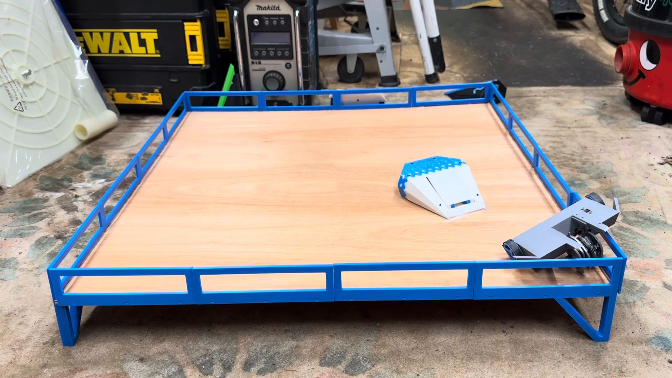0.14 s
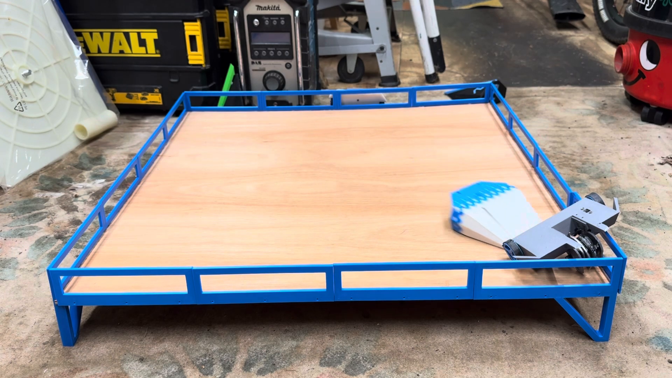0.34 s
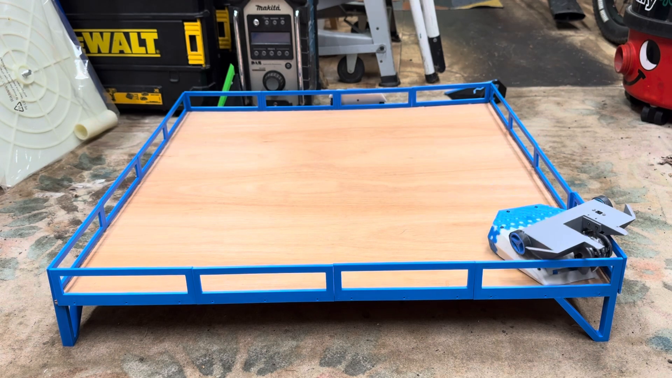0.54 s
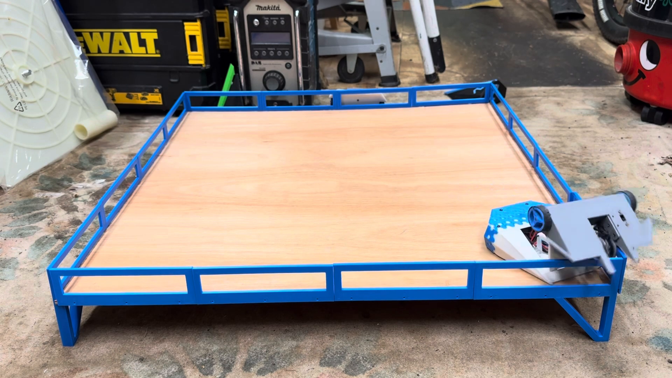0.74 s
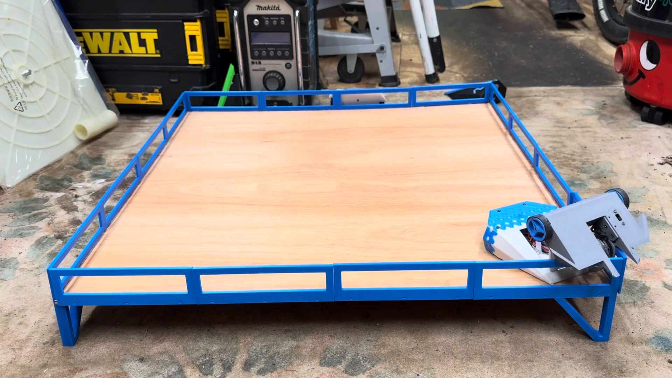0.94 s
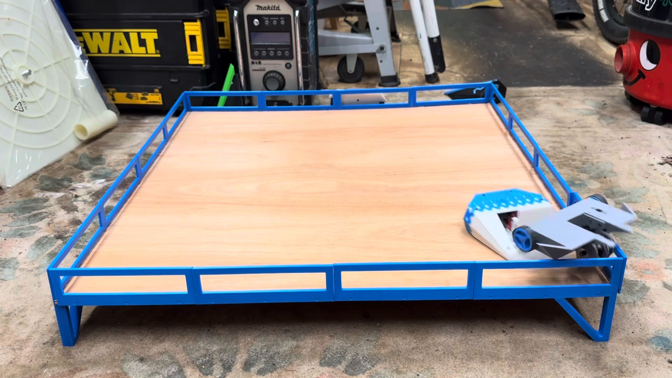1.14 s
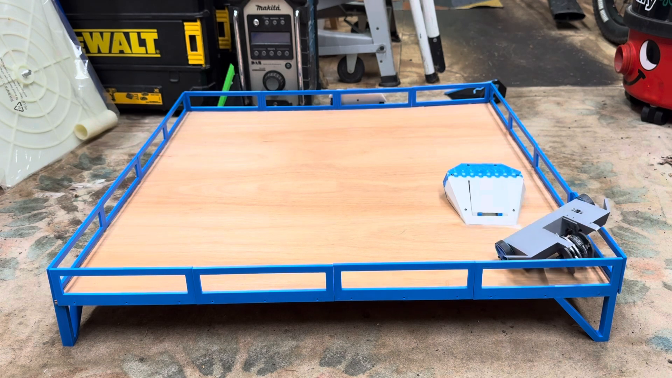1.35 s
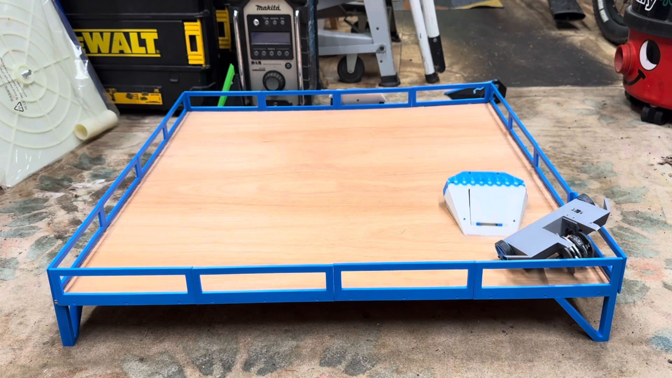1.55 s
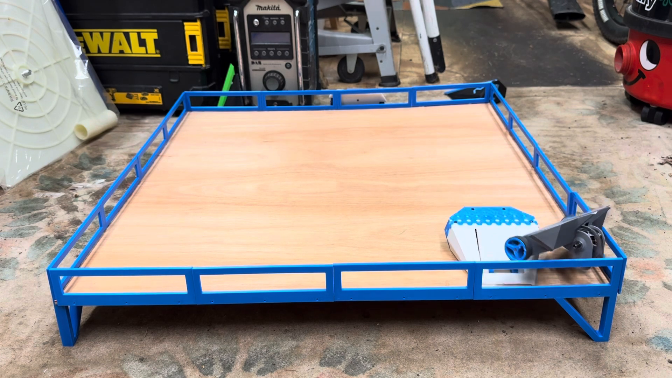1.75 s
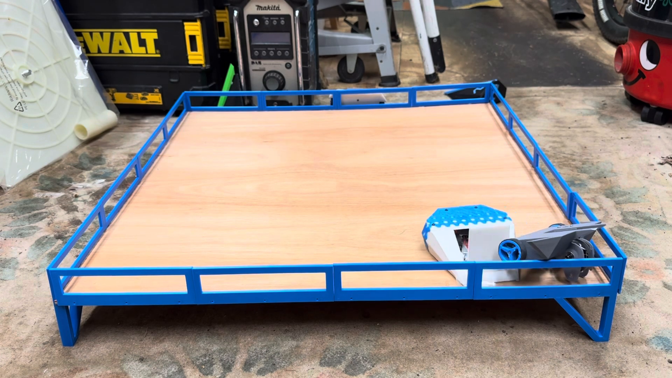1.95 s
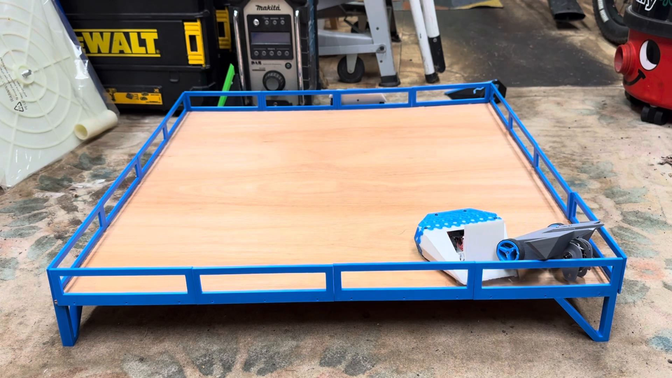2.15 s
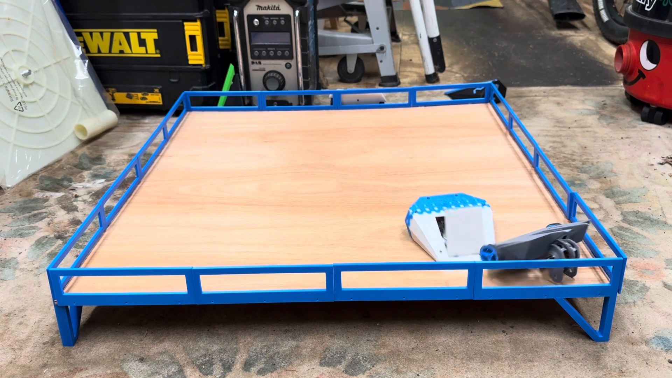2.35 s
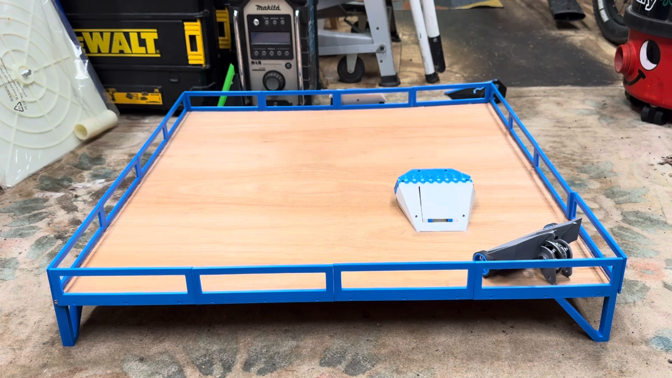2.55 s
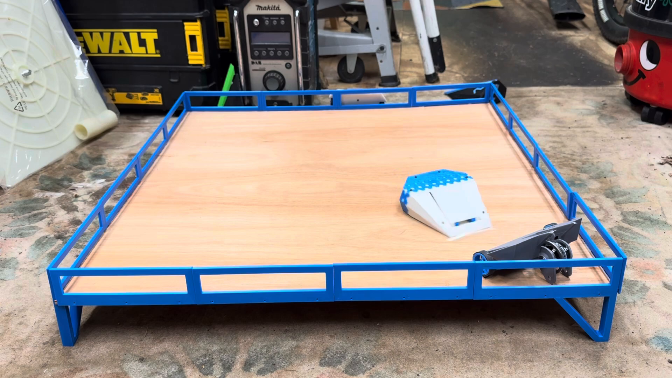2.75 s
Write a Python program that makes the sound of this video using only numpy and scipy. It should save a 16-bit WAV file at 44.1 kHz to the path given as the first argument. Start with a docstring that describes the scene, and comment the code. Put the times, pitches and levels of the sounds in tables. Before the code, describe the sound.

Two small remote-controlled robots whir and grind on a wooden board, close in stereo in a garage. A brief coasting whir fades, then from 0.15 to 0.9 seconds gears buzz, wheels judder, shells clack and rasp. A short burst at 1.0 ends in clustered knocks near 1.25. Another shove runs 1.45 to 2.1, then a short whir, the loudest sharp knock at 2.4, and fading gears with a faint last spin.

```python
"""Two small remote-controlled robots shove each other in short bursts on a wooden arena floor in a garage.
Gears click and hiss at motor speed, loose ones buzz on a pitch, and overtones of one tone make the motors whine.
Random clicks with their own tone colours become juddering plastic wheels, rasping shells and arena rumble.
Shells knock, once sharply, as a click, then a thump and chatter; wood and shells ring along with the contacts.
A close pair of microphones hears this with quick reflections and the tail of the room."""
import sys
import numpy as np
from scipy import signal
from scipy.fft import rfft, irfft
from scipy.io import wavfile

SR = 44100
rng = np.random.default_rng(int(sys.argv[2]) if len(sys.argv) > 2 else 0)


def generate_wav(sig):
    """Save sig (samples, or channels by samples) to the path in sys.argv[1] as 16-bit PCM at SR."""
    pcm = np.round(np.clip(np.atleast_2d(sig).T, -1, 1) * 32767).astype(np.int16)
    wavfile.write(sys.argv[1], SR, pcm)


N = 121275  # samples, 2.75 s

# Bursts of throttle: [start t/s, spin-up t/s, hold t/s, coast t/s, gear level/dB]
THROTTLE_BURSTS = [(-.1, .03, .01, .16, -44), (.12, .1, .675, .115, -37), (1.008, .1, .092, .27, -37.6),
                   (1.452, .095, .603, .09, -36.8), (2.25, .04, .115, .26, -37.8), (2.62, .07, .1, .1, -48)]
# Tone colour of the gear noise: [f/Hz, level/dB per Hz]
GEAR_COLOUR = [(60, -17), (250, -7.5), (600, 4.5), (1100, 1.5), (1800, -1.5), (2450, 5), (3100, 2.5),
               (4600, -3.5), (5350, 1), (5900, 0), (7200, 2), (8500, -1.5), (10500, 7), (12000, 0.5),
               (14000, 4.5), (16000, -1.5)]
LOUDNESS_POWER, TEETH_PER_S = 1.78, 1500  # loudness as a power of speed; tooth rate at full speed
TOOTH_SPREAD_DB, TOOTH_JITTER, GEAR_HISS = 4, .25, 1  # jitter on a log scale; hiss relative to teeth
GEAR_FLUTTER_DB, GEAR_FLUTTER_HZ = 0.95, 56

# How hard the wheels scrub: [t/s, level/dB]
SCRUB_LEVEL = [(0, -50), (.11, -105), (.135, -62), (.16, -49.5), (.24, -40.5), (.38, -42), (.42, -32),
               (.6, -35), (.7, -38.5), (.88, -38), (.95, -43.5), (1.01, -69), (1.04, -48.5), (1.13, -42.5),
               (1.3, -39.5), (1.43, -65), (1.52, -40), (1.66, -39), (1.8, -30), (1.88, -34), (2.14, -37.5),
               (2.22, -55.5), (2.27, -44), (2.38, -40), (2.45, -43.5), (2.63, -59), (2.67, -53.5),
               (2.75, -64)]
# Tone colour of slipping plastic: [f/Hz, level/dB per Hz]
SLIP_COLOUR = [(30, -28), (100, -25), (190, -12), (350, -13.5), (490, -1.5), (620, -7.5), (790, -2),
               (1000, -0.5), (1200, -1.5), (1400, -4.5), (1620, -1.5), (1950, -2), (2400, -2), (3300, -7.5),
               (4600, -19), (8000, -42), (16000, -51)]
SLIPS_PER_S, SLIP_SPREAD_DB, JUDDER_DB, JUDDER_HZ = 2500, 0.5, 3.5, 58

# The arena rumbling under the robots: [t/s, level/dB]
RUMBLE_LEVEL = [(0, -49), (.14, -93), (.23, -49), (.44, -46), (.62, -54), (.9, -53.5), (1.02, -69),
                (1.16, -47), (1.27, -40.5), (1.46, -81), (1.54, -55.5), (1.74, -46.5), (2.14, -58.5),
                (2.23, -78), (2.31, -46), (2.44, -48.5), (2.6, -62.5), (2.75, -56.5)]
# Tone colour of that rumble: [f/Hz, level/dB per Hz]
RUMBLE_COLOUR = [(20, -48), (40, -40), (55, -0.5), (70, 1), (85, -18), (122, 2.5), (155, -0.5), (183, 6.5),
                 (215, -6.5), (350, 1), (600, -23), (2000, -56)]

# Motors straining from rest: [start t/s, length t/s, level/dB]
WHINE_TIMES = [(0.13, 0.04, -55), (1.443, 0.084, -50), (2.227, 0.045, -55.5)]
# Overtones of the whine: [f/Hz, level/dB]
WHINE_OVERTONES = [(920, -11.5), (1840, -25), (2760, -23), (4600, -31), (9000, -27)]
WHINE_HZ, WHINE_WAVER, WHINE_WAVER_HZ, WHINE_ROUGH_DB = 930, 0.0064, 111, -4  # waver is a share of pitch

# Gears singing as they mesh: [start t/s, length t/s, middle pitch f/Hz, level/dB]
MESH_NOTES = [(0.145, 0.12, 726, -50), (.19, 0.47, 820, -46.5), (0.216, 0.17, 1083, -42.5),
              (0.221, 0.18, 2390, -52), (.49, 0.15, 867, -42), (.53, 0.18, 1136, -39.5),
              (.51, 0.16, 2200, -48), (.68, 0.3, 1197, -44.5), (0.684, 0.29, 5350, -60.5),
              (1.023, 0.033, 760, -54.5), (1.065, 0.27, 2440, -60), (1.112, 0.037, 1210, -44.5),
              (1.079, 0.23, 5330, -59), (1.471, 0.19, 802, -47.5), (1.5, 0.19, 1130, -48.5),
              (1.761, 0.21, 880, -41), (1.88, 0.088, 2510, -41.5), (2.04, .15, 2320, -48),
              (2.019, 0.21, 768, -42), (2.232, 0.073, 2630, -56), (2.341, 0.084, 2540, -44),
              (2.39, 0.25, 5300, -52.5), (2.39, 0.21, 6360, -54.5), (2.66, 0.11, 2470, -57.5)]
MESH_CLICKS_PER_S, MESH_SPREAD_DB, MESH_JUDDER_DB, MESH_JUDDER_HZ = 3000, 0.3, 1.5, 80
MESH_SAG, MESH_WAVER, MESH_WAVER_HZ = .05, 0.021, 45.8  # sag and waver are shares of the pitch
MESH_WIDTH_HZ, MESH_WIDTH_SHARE, MESH_FADE_DB = 54, 0.061, 9  # fuzziness: a fixed part plus a share of pitch

# Knocks of a shell on the board or rail: [t/s, body level/dB, first sharp contact level/dB]
SHELL_KNOCKS = [(.232, -35.5, -42), (.394, -28.5, -31.5), (.504, -44, -38), (0.566, -29, -35),
                (.719, -29.5, -35), (.742, -32, -34), (0.856, -30.5, -32.5), (.881, -33, -50),
                (1.247, -34, -23.5), (1.2528, -27.5, -51), (1.271, -32.5, -29), (1.289, -37, -32),
                (1.511, -42.5, -40.5), (1.697, -28, -30), (1.772, -35, -44), (1.793, -28, -28),
                (1.832, -29, -34), (1.914, -38, -31), (1.93, -35, -32.5), (1.972, -28.5, -44),
                (2.093, -34.5, -45), (2.133, -32.5, -38), (2.297, -30, -34), (2.3933, -17.5, -23),
                (2.421, -32, -38)]
# Tone colour of the body's blow: [f/Hz, level/dB per Hz]
BLOW_COLOUR = [(30, -57), (100, -13), (280, -5), (450, -3), (650, -14.5), (900, 0), (1230, -0.5),
               (1600, -2), (2300, -7), (3300, -45), (6000, -42), (16000, -74)]
# Tone colour of the sharp contact before it: [f/Hz, level/dB per Hz]
CONTACT_COLOUR = [(200, -11.5), (1200, -6), (2000, -0.5), (2600, -4), (3100, 2), (3800, -8.5),
                  (5000, -12.5), (8000, -46.5), (16000, -48)]
BLOW_DELAY_S, BLOW_S, CONTACT_S, CHATTER_S = 0.002712, 0.0022, 0.0016, 0.0034  # wait, then three decay times
THUMP, BLOW_NOISE, CHATTER = 0.7, 0.12, 0.44  # shares of the body's level
KNOCK_S = 0.0069  # seconds of unit-level sound holding the energy of one knock

# Shells rasping together: [start t/s, length t/s, level/dB, share of bright squeak 0-1]
SHELL_SCRAPES = [(0.419, 0.018, -26.5, 0.05), (0.453, 0.019, -29.5, 0), (0.579, 0.098, -32.5, 0.19),
                 (1.222, 0.038, -28, 0), (1.284, 0.025, -30.5, 0), (1.659, 0.081, -26.5, 0),
                 (1.729, 0.027, -33, 0.7)]
# Tone colour of the dull rasp: [f/Hz, level/dB per Hz]
RASP_COLOUR = [(100, -13.5), (500, -14), (1000, 0.5), (1700, 5), (2800, 6.5), (3900, 2.5), (5000, -9.5),
               (8000, -6.5), (16000, -42)]
# Tone colour of the bright squeak: [f/Hz, level/dB per Hz]
SQUEAK_COLOUR = [(200, -6), (2000, 10), (4000, 8.5), (7300, 4.5), (10000, 17), (16000, -27)]
RASPS_PER_S, RASP_SPREAD_DB, SQUEAKS_PER_S, SQUEAK_SPREAD_DB = 2200, 2.5, 9800, 2

# Gear teeth snapping into mesh: [t/s, level/dB]
GEAR_TICKS = [(0.426, -27.5), (0.454, -30), (1.734, -25), (2.274, -34)]

# Rings of the board and shells: [middle f/Hz, time to fall by 60 dB t/s, level/dB before RING_DB]
BOARD_RINGS = [(182, 0.38, -10), (287, 0.51, -13.5), (361.7, 0.24, -10), (406, 0.072, -24),
               (482.2, 0.1, -13), (525, 0.11, -9.5), (721, 0.031, -10), (812, 0.084, -18.5),
               (852, 0.18, -10.5), (1146, 0.079, -17), (1216, 0.29, -27), (1577, 0.11, -13.5),
               (2375, 0.036, -6.5), (3810, 0.017, -9.5)]
RING_DB, SPOT_DETUNE, SPOT_MOVE_HZ = -9.5, .04, 7  # detune is the largest shift, as a share of pitch

# Garage reverberation: [f/Hz, time to fall by 60 dB t/s]
ROOM_DECAY = [(100, 0.7), (400, 0.26), (1500, 0.15), (5000, 0.34), (15000, 0.28)]
# Strength of the reflections: [f/Hz, level/dB]
ECHO_COLOUR = [(100, -7), (500, -1.5), (1200, 1.5), (2100, -6.5), (3200, -6), (5000, 5), (7000, 6.5),
               (8400, -5), (9800, -9), (12000, 5), (15000, -14)]
EARLY_S = 0.0074  # decay time of the quick reflections
CONTACT_ROOM_DB, CONTACT_EARLY_DB, GEAR_ROOM_DB = -1, 3.5, -16.5

# Microphone pair, timing: [f/Hz, lead of the left/radians]
LEFT_LEAD = [(20, 0), (450, -.1), (950, -.6), (2000, -.35), (3790, .7), (4820, .1), (5770, -1.5),
             (6600, .5), (7670, 2.8), (8500, 3.14), (9800, 3.03), (11500, 2.4), (14300, .8), (15000, .1)]
# Microphone pair, balance: [f/Hz, left minus right level/dB]
LEFT_TILT = [(100, 2), (350, 2), (700, 5), (1200, -0.5), (1700, -1), (3000, 0), (4000, 1.5), (5300, 1.5),
             (7300, 3.5), (8500, 6), (15000, -3.5)]
FLOOR_DB = -97  # background noise before the microphone balance
EDGE_HZ = 15950  # upper edge of the sound


def amp(db):
    """Turns decibels into a gain."""
    return 10 ** (np.asarray(db) / 20)


def unit(x):
    """Scales a sound to an average strength (rms) of one."""
    return x / np.sqrt(np.mean(x ** 2) + 1e-20)


def read(points, hz):
    """Reads between table points, with pitch spaced logarithmically."""
    f, value = np.transpose(points)
    return np.interp(np.log(hz + 1), np.log(f + 1), value)


def level(points):
    """Turns a level curve in dB into a gain for every sample."""
    return amp(np.interp(np.arange(N) / SR, *np.transpose(points)))


def add(mix, s, sound):
    """Mixes a sound in, starting at s seconds."""
    part = mix[max(round(s * SR), 0):][:len(sound)]
    part += sound[:len(part)]


def colour(x, points, size=8192):
    """Gives a sound a tone colour with a filter of unit energy that never rings ahead of its input."""
    log_gain = np.log(amp(read(points, abs(np.fft.fftfreq(size, 1 / SR)))))
    spectrum = np.exp(np.conj(signal.hilbert(log_gain)))
    taps = np.fft.ifft(spectrum).real[:size // 2]
    return signal.fftconvolve(x, taps / np.linalg.norm(taps))[:N]


def wander(hz):
    """Makes a random drift, mostly slower than hz, with an rms of one."""
    noise = rfft(rng.standard_normal(N))
    slow = 1 / (1 + (np.fft.rfftfreq(N, 1 / SR) / hz) ** 4)
    return unit(irfft(noise * slow, N))


def grains(per_s, spread_db):
    """Makes random clicks of uneven size, with an rms of one."""
    size = amp(spread_db * np.minimum(rng.exponential(1, N), 3.5))
    sign = rng.choice([-1, 1], N)
    return unit(size * sign * (rng.random(N) < per_s / SR))


def gears():
    """Teeth click at a rate set by motor speed; the noise swells and coasts down with it."""
    t = np.arange(N) / SR
    speed, loud = np.zeros(N), np.zeros(N)
    for start, spin_up, hold, coast, db in THROTTLE_BURSTS:
        rise = (t - start) / spin_up
        fall = 1 - (t - start - spin_up - hold) / coast
        run = np.clip(np.minimum(rise, fall), 0, 1)
        speed += run
        loud += amp(db) * run ** LOUDNESS_POWER
    turns = np.cumsum(TEETH_PER_S * speed * np.exp(TOOTH_JITTER * wander(400))) / SR
    clicks = np.diff(np.floor(turns), prepend=0) > 0  # one click per whole count
    size = amp(TOOTH_SPREAD_DB * np.clip(rng.standard_normal(N), -2, 2))
    teeth = clicks * size * rng.choice([-1, 1], N)
    noise = unit(unit(teeth) + GEAR_HISS * rng.standard_normal(N))
    flutter = amp(GEAR_FLUTTER_DB * wander(GEAR_FLUTTER_HZ))
    return colour(loud * flutter * noise, GEAR_COLOUR)


def wheels():
    """Plastic wheels catch and slip in juddering clumps."""
    judder = amp(JUDDER_DB * wander(JUDDER_HZ))
    slips = unit(grains(SLIPS_PER_S, SLIP_SPREAD_DB) * judder)
    return colour(level(SCRUB_LEVEL) * slips, SLIP_COLOUR)


def rumble():
    """Small bumps of the wheels drum on the whole arena."""
    bumps = grains(per_s=600, spread_db=0.34)
    return colour(level(RUMBLE_LEVEL) * bumps, RUMBLE_COLOUR)


def whine(count=9):
    """Chopped current makes the motors sing while they strain from rest."""
    turns = np.cumsum(WHINE_HZ * (1 + WHINE_WAVER * wander(WHINE_WAVER_HZ))) / SR
    tone = np.zeros(N)
    for k in range(1, count + 1):
        wave = np.sin(2 * np.pi * (k * turns + rng.random()))
        tone += amp(read(WHINE_OVERTONES, k * WHINE_HZ)) * wave
    swell = np.zeros(N)
    for start, length, db in WHINE_TIMES:
        add(swell, start, amp(db) * signal.windows.tukey(int(length * SR), .5))
    rough = unit(amp(WHINE_ROUGH_DB * wander(WHINE_WAVER_HZ)))
    return swell * unit(tone) * rough


def resonate(x, hz, width):
    """A steep resonance follows a pitch curve; a larger width in Hz makes it fuzzier."""
    turn = np.exp(2j * np.pi * np.cumsum(hz) / SR)
    r = np.exp(-np.pi * width / SR)
    # Shift the pitch down to zero, smooth twice, and shift it back.
    smooth = signal.lfilter([(1 - r) ** 2], [1, -2 * r, r * r], x / turn)
    return (turn * smooth).real


def meshes():
    """Loose gears rattle in clumps on a fuzzy pitch that sags and fades as the wheel slows."""
    out = np.zeros(N)
    for start, length, hz, db in MESH_NOTES:
        swell = signal.windows.tukey(int(length * SR), .5)
        n = len(swell)
        slope = np.linspace(.5, -.5, n)
        swell = swell * amp(MESH_FADE_DB * slope)
        pitch = hz * (1 + MESH_SAG * slope + MESH_WAVER * wander(MESH_WAVER_HZ)[:n])
        judder = amp(MESH_JUDDER_DB * wander(MESH_JUDDER_HZ))
        clicks = grains(MESH_CLICKS_PER_S, MESH_SPREAD_DB) * judder
        note = unit(resonate(clicks[:n], pitch, MESH_WIDTH_HZ + MESH_WIDTH_SHARE * hz))
        add(out, start, amp(db) * swell * note)
    return out


def strike(decay_s):
    """A dying envelope holds the energy of one knock."""
    shape = np.exp(-np.arange(SR // 10) / SR / decay_s)
    return shape * np.sqrt(KNOCK_S * SR) / np.linalg.norm(shape)


def knocks():
    """An edge clicks first, then the body lands on the board and chatters briefly."""
    edge, body = np.zeros((2, N))
    for s, db, edge_db in SHELL_KNOCKS:
        edge_noise, blow_noise, chatter_noise = rng.standard_normal((3, SR // 10))
        add(edge, s, amp(edge_db) * strike(CONTACT_S) * edge_noise)
        blow = BLOW_NOISE * strike(BLOW_S) * blow_noise
        chatter = CHATTER * strike(CHATTER_S) * chatter_noise
        landing = blow + chatter
        landing[0] += THUMP * np.sqrt(KNOCK_S * SR)  # a single sharp push
        add(body, s + BLOW_DELAY_S, amp(db) * landing)
    return colour(edge, CONTACT_COLOUR) + colour(body, BLOW_COLOUR)


def scrapes():
    """Shell rubs on shell in short rasps, some with a bright squeak."""
    dull, bright = np.zeros((2, N))
    for start, length, db, share in SHELL_SCRAPES:
        stroke = amp(db) * signal.windows.tukey(int(length * SR), .5)
        add(dull, start, stroke * np.sqrt(1 - share))
        add(bright, start, stroke * np.sqrt(share))
    rasp = colour(dull * grains(RASPS_PER_S, RASP_SPREAD_DB), RASP_COLOUR)
    squeak = colour(bright * grains(SQUEAKS_PER_S, SQUEAK_SPREAD_DB), SQUEAK_COLOUR)
    return rasp + squeak


def ticks():
    """Gear teeth snap into mesh in quickly dying grains, as bright as the squeak."""
    snaps = np.zeros(N)
    for s, db in GEAR_TICKS:
        add(snaps, s, amp(db) * strike(CONTACT_S))
    return colour(snaps * grains(SQUEAKS_PER_S, SQUEAK_SPREAD_DB), SQUEAK_COLOUR)


def board(x, count=3):
    """The board and the shells ring along, a little higher or lower as the point of contact moves."""
    t = np.arange(SR // 2) / SR
    place, out = np.clip(wander(SPOT_MOVE_HZ), -1, 1), x
    for spot in np.linspace(-1, 1, count):
        ring = np.zeros(len(t))
        for hz, t60, db in BOARD_RINGS:
            wave = np.cos(2 * np.pi * hz * (1 + SPOT_DETUNE * spot) * t)
            ring += amp(db) * unit(amp(-60 * t / t60) * wave)
        ring /= np.sqrt(len(t))
        nearness = np.maximum(1 - abs(place - spot), 0)
        out = out + amp(RING_DB) * signal.fftconvolve(x * nearness, ring)[:N]
    return out


def garage(x, wet_db, early_db):
    """Direct sound meets two microphones, then quick reflections off the arena and the room's tail."""
    hz = np.fft.rfftfreq(2 * N, 1 / SR)
    spectrum = rfft(x, 2 * N)
    turn = np.exp(.5j * read(LEFT_LEAD, hz))  # half the lead on each side
    direct = irfft(spectrum * np.array([turn, 1 / turn]))[:, :N]
    t = np.arange(SR // 2) / SR
    signs = rng.choice([-1., 1.], (2, 2, len(t)))
    taps = signs * (rng.random((2, 2, len(t))) < 3000 / SR)  # scattered echoes, 3000 per second
    f, at, z = signal.stft(taps[0] * (t > .008), SR, nperseg=256)
    decay = amp(-60 * at / read(ROOM_DECAY, f)[:, None])
    tail = signal.istft(z * decay, SR, nperseg=256)[1][:, :len(t)]
    early = taps[1] * (t > .001) * np.exp(-t / EARLY_S)
    echo = amp(wet_db) * tail / np.linalg.norm(tail[0])
    echo = echo + amp(early_db) * early / np.linalg.norm(early[0])
    left, right = rfft(echo, 2 * N) * amp(read(ECHO_COLOUR, hz))
    same = 1 / (1 + (hz / 520) ** 4)  # both sides share the bass
    right = same * left + np.sqrt(1 - same ** 2) * right
    return direct + irfft(spectrum * np.array([left, right]))[:, :N]


def background():
    """A very quiet steady noise, separate on each side, has the tone colour of the slipping plastic."""
    return amp(FLOOR_DB) * np.array([colour(rng.standard_normal(N), SLIP_COLOUR) for _ in range(2)])


def scene():
    """Both robots play in the garage, over a very quiet background."""
    drive = garage(gears() + whine() + meshes(), GEAR_ROOM_DB, early_db=-6.5)
    touching = board(wheels() + knocks() + scrapes() + ticks())
    contact = garage(touching * amp(-6.0), CONTACT_ROOM_DB, CONTACT_EARLY_DB)
    arena = garage(rumble(), wet_db=-11.5, early_db=-1)
    return drive + contact + arena + background()


def record(dry):
    """The two microphones get their balance at each pitch, then the highest treble is cut."""
    hz = np.fft.rfftfreq(2 * N, 1 / SR)
    tilt = amp(read(LEFT_TILT, hz) / 2)  # half the difference on each side
    heard = irfft(rfft(dry, 2 * N) * np.array([tilt, 1 / tilt]))[:, :N]
    low_pass = signal.firwin(511, EDGE_HZ, window=("kaiser", 9), fs=SR)
    return signal.oaconvolve(heard, low_pass[None], "same")


dry = scene()
out = record(dry)
generate_wav(out)
```